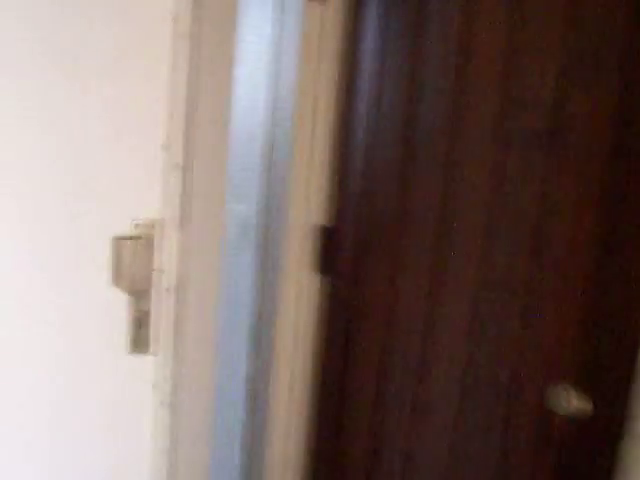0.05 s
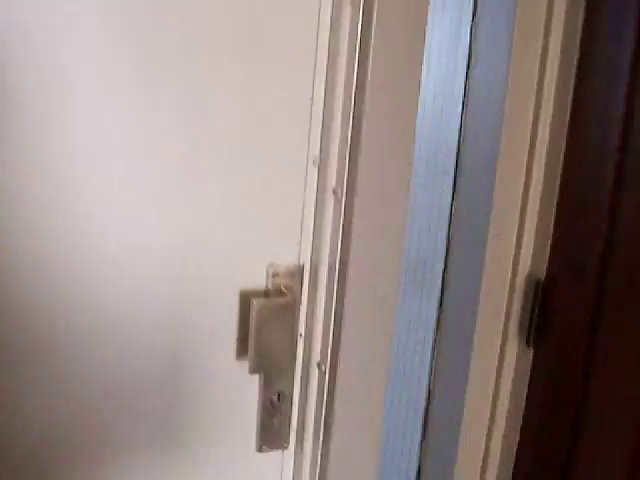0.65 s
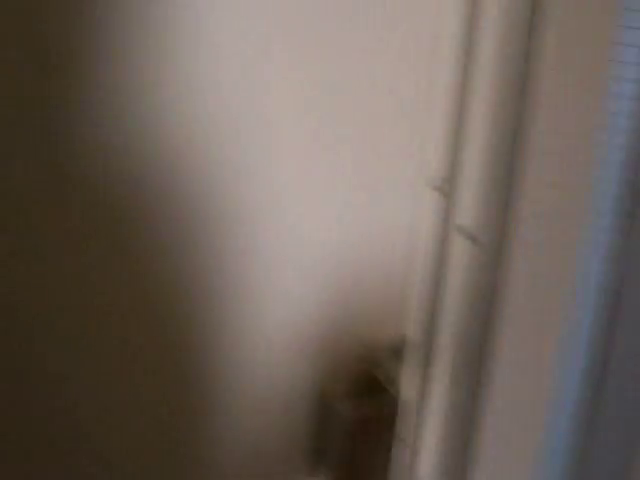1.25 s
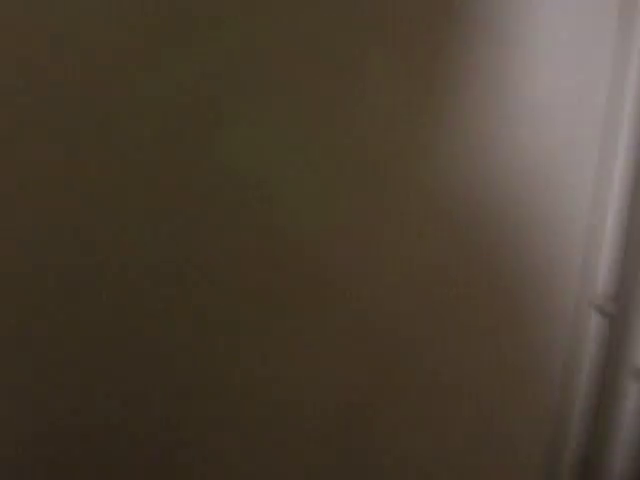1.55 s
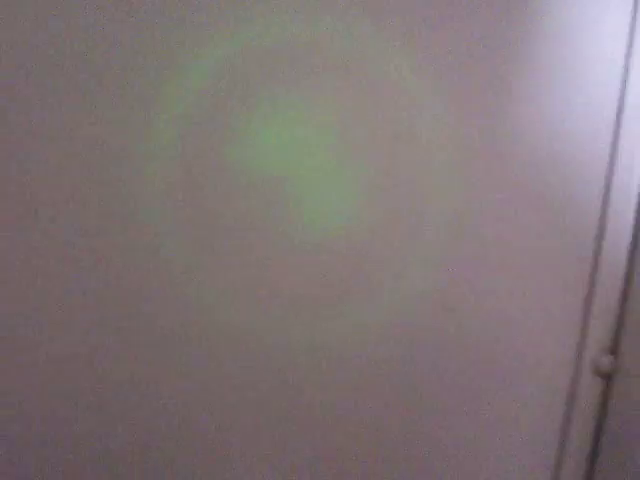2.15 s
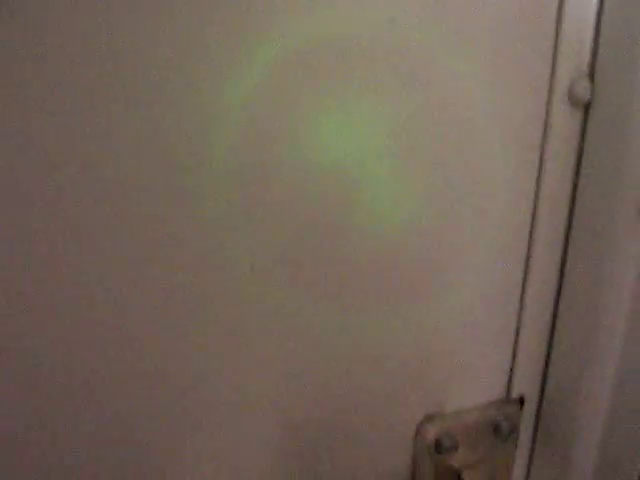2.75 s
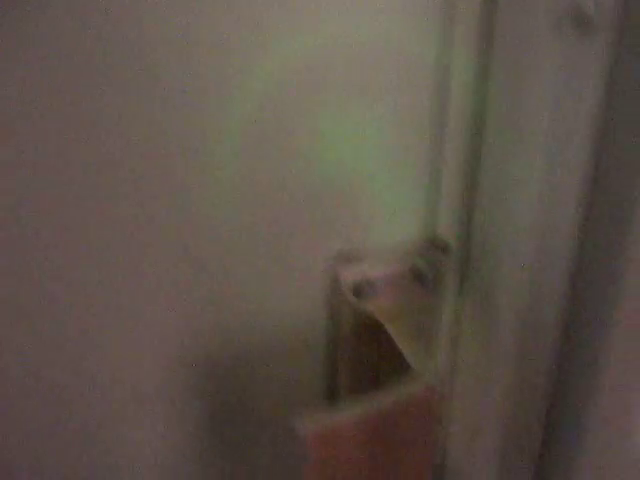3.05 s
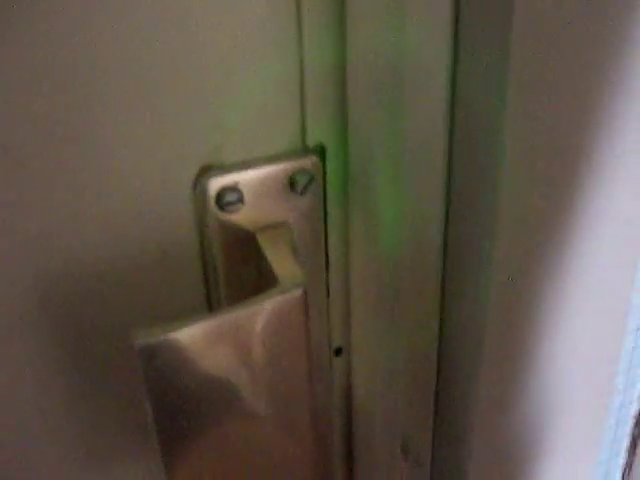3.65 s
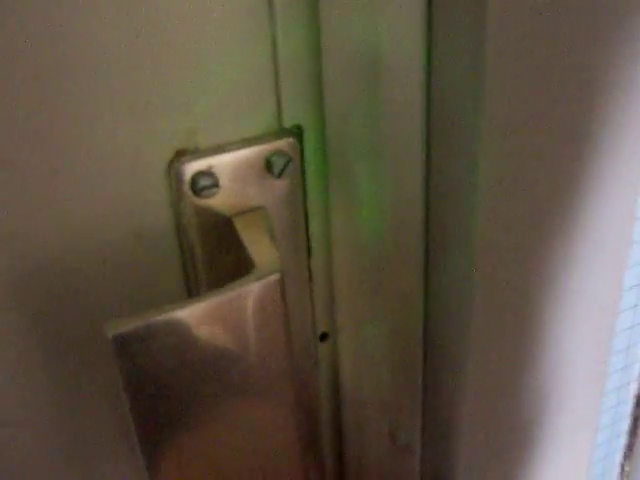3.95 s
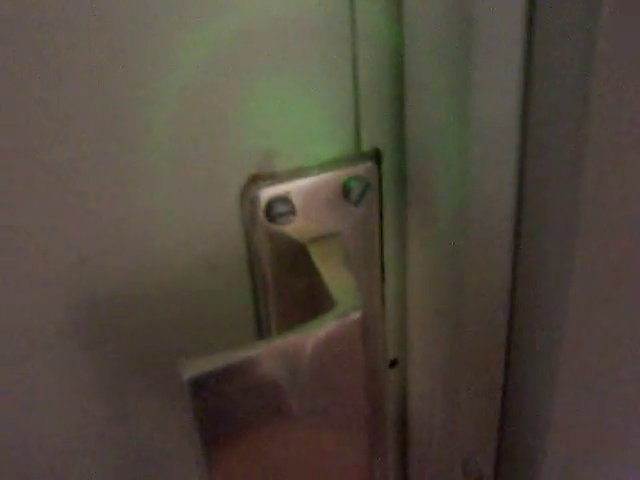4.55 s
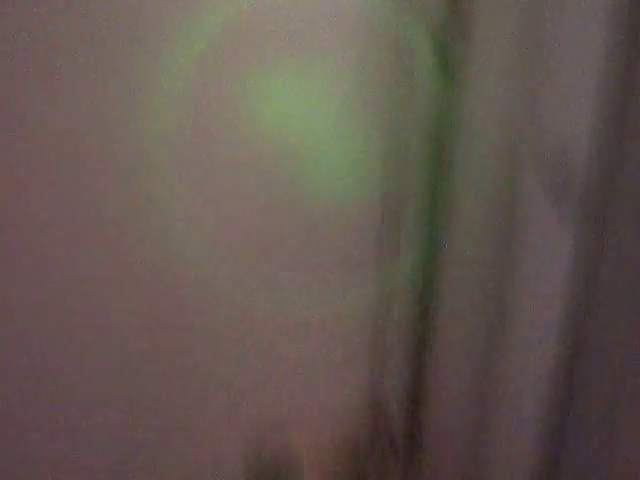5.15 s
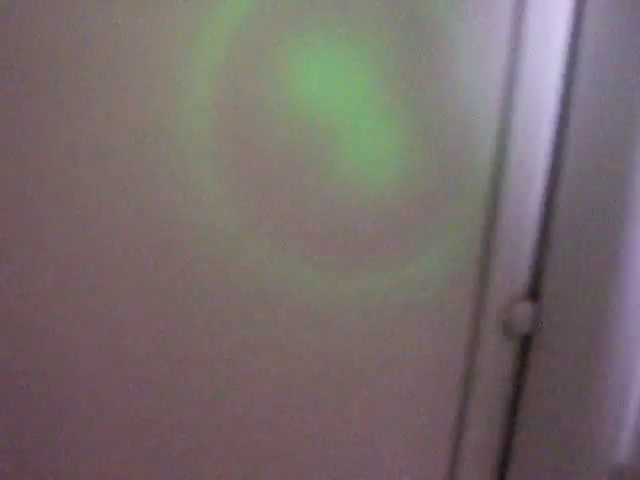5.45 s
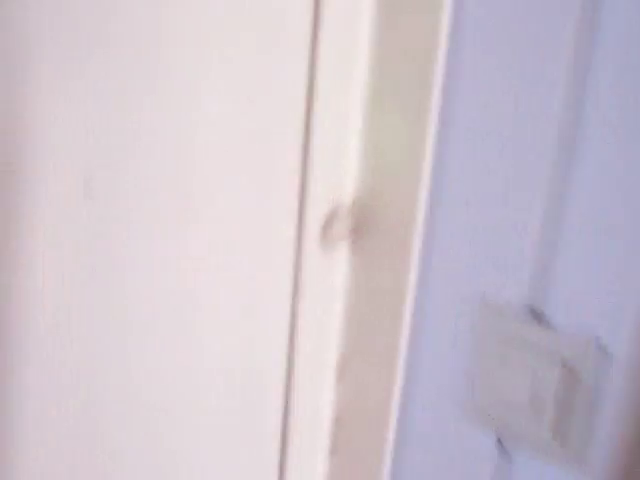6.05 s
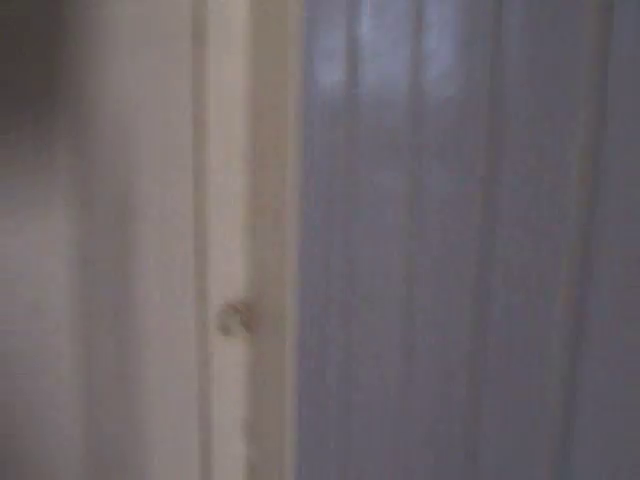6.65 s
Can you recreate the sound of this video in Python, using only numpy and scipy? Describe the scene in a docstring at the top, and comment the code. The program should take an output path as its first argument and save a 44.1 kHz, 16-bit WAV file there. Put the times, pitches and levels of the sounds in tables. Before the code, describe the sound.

In a small hallway, keys jangle and ring close to a hand-held microphone while clothing swishes. One key is pushed into a metal lock and worked around, clicking and scraping as the others dangle and the door bumps softly. Then the door comes open with several loud, deep thuds and a sharp latch clack, followed by a few smaller clicks. Low handling rumble runs underneath.

```python
"""Keys unlocking a door

Someone walks up with a jingling bunch of keys, pushes one into the rim lock and turns it. The keys ring
as they knock together; levers and bolt click and scrape through the lock case; then the door is pulled
free and its leaf booms with heavy thuds. Sleeves rustle, the hand-held microphone rumbles, and the
near walls of a small hallway add short reflections."""
import sys
import numpy as np
from scipy import signal
from scipy.fft import rfft, irfft
from scipy.io import wavfile
from scipy.ndimage import uniform_filter1d, minimum_filter1d

SR = 44100
rng = np.random.default_rng(int(sys.argv[2]) if len(sys.argv) > 2 else 0)


def master(y):
    """Save y as 16-bit WAV."""
    cut = np.clip(np.atleast_2d(y).T, -1, 1)
    pcm = np.round(cut * 32767)  # scale
    wavfile.write(sys.argv[1], SR, pcm.astype(np.int16))


N = 304290
TIME = np.arange(N) / SR
AGE = TIME[:SR // 2]   # time since a blow


def from_db(db):
    return 10 ** (np.asarray(db) / 20)


def rms_one(x):
    return x / np.sqrt(np.mean(x ** 2) + 1e-20)


def peak_one(x, size=88):
    """Scale a blow so that its loudest stretch of size samples has rms 1."""
    return x / np.sqrt(uniform_filter1d(x ** 2, size).max() + 1e-20)


def fader(curve):
    """Gain that rides a curve of t/s, level/dB."""
    return from_db(np.interp(TIME, *np.transpose(curve)))


def add(out, s, x):
    """Mix x into out from time s on."""
    at = max(round(s * SR), 0)
    out[at:at + len(x)] += x[:max(N - at, 0)]


def fade(t60):
    return np.exp(-np.log(1000) * AGE / max(t60, 1e-3))


def filtered(x, hz, kind, order=2):
    sos = signal.butter(order, np.clip(hz, 10, .45 * SR), kind, fs=SR, output="sos")
    return signal.sosfilt(sos, x + 1e-18)


def resonance(x, hz, width_hz):
    """Two-pole resonator with gain 1 at its peak."""
    r, w = np.exp(-np.pi * width_hz / SR), 2 * np.pi * hz / SR
    return signal.lfilter(np.array([1, 0, -1]) * (1 - r * r) / 2, [1, -2 * r * np.cos(w), r * r], x + 1e-18)


def ring(x, hz, t60):
    """A unit click sets a sine of height 1 ringing."""
    r, w = np.exp(-np.log(1000) / (t60 * SR)), 2 * np.pi * hz / SR
    return signal.lfilter([0, np.sin(w)], [1, -2 * r * np.cos(w), r * r], x + 1e-18)


def noise(spectrum):
    """Noise with the given colour, rms 1."""
    hz, db = np.transpose(spectrum)
    log_hz = np.log(np.fft.rfftfreq(N, 1 / SR) + 1)
    colour = from_db(np.interp(log_hz, np.log(hz), db, -90, -90))
    return rms_one(irfft(rfft(rng.standard_normal(N)) * colour, N))


def grains(per_s, spread_db, size=N):
    """Tiny contacts at random moments, of uneven size and sign; rms 1."""
    chance, strength = rng.random((2, size))
    at, out = np.flatnonzero(chance < per_s / SR), np.zeros(size)
    exponential = np.minimum(-np.log(1 - strength[at]), 3)
    out[at] = from_db(spread_db * exponential) * (-1) ** at
    return rms_one(out)


def contact(length_s, per_s, first, build_s):
    """A first touch, then a chatter of smaller ones that builds up and decays by 30 dB in length_s."""
    chatter = grains(per_s, 3.5, size=len(AGE)) * fade(2 * length_s) * (1 - np.exp(-AGE / build_s))
    chatter /= np.sqrt(np.sum(chatter ** 2) + 1e-12)
    chatter[0] += first
    return chatter


# colours of the bed's rumble, air and hiss: f/Hz, level/dB
RUMBLE_COLOUR = [(15, -3.5), (28, -2.5), (45, -6.5), (70, -9.5), (110, -21.5), (200, -26)]
AIR_COLOUR = [(60, -5.5), (110, 4), (190, -1.5), (300, -3), (500, -10.5), (900, -16.5), (1600, -24),
              (3500, -47.5)]
HISS_COLOUR = [(700, -10.5), (1300, 0.5), (2000, 4), (3200, 3), (4700, 1), (7000, 1.5), (8200, -3),
               (9500, -27)]
# body moves that jolt the microphone: t/s, rumble/dB, clothes rustle/dB, hold/s, t60/s
BODY_MOVES = [(0.483, -31, -45.5, 0.062, 0.78), (1.244, -29, -49, 0.53, 1.6), (1.66, -30, -45, 0.35, 1.1),
              (3.842, -32.5, -51, .2, 1.04), (4.524, -26, -46, 0.11, 1.9), (4.83, -32, -46.5, 0.057, 2.5),
              (5.307, -40, -45, 0.11, 0.33), (5.619, -14, -38.5, 0.087, 0.5),
              (5.763, -17, -37.5, 0.11, 0.89), (5.926, -11, -32, 0.051, 0.45),
              (6.06, -26, -50.5, 0.056, 1.7), (6.514, -20.5, -51.5, 0.1, 1.7)]


def room_tone_and_handling(rumble_db=-3, hiss_db=-1, grit=0.086, swell_s=0.031):
    """A bed of hallway noise; each body move swells, holds and dies, adding rumble and rustle."""
    jolt, rustle = 0, 0
    for s, jolt_db, cloth_db, hold, t60 in BODY_MOVES:
        age = np.maximum(TIME - s, 0)
        attack = 1 - np.exp(-(age / swell_s) ** 2)
        move = attack * np.exp(-np.log(1000) * np.maximum(age - hold, 0) / t60)
        jolt = np.hypot(jolt, from_db(jolt_db) * move)
        rustle = np.hypot(rustle, from_db(cloth_db) * move)
    still_rumble, still_air, still_hiss = from_db([-41.5, -53, -61.5])   # when nothing moves
    crackle = rms_one(filtered(grains(1100, 5.1), [1300, 6500], "band", order=1))
    rumble = np.hypot(still_rumble, jolt) * noise(RUMBLE_COLOUR)
    air = np.hypot(still_air, rustle) * noise(AIR_COLOUR)
    hiss = np.hypot(still_hiss, from_db(-11.5) * rustle) * (noise(HISS_COLOUR) + grit * crackle)
    return from_db(rumble_db) * rumble + air + from_db(hiss_db) * hiss


def putter(level_db=-40, per_s=30, soft_hz=190):
    """A faint electrical putter: evenly spaced pulses with the edges rounded off."""
    pulses = np.diff(np.floor((TIME - .007) * per_s), prepend=-1)
    soft = filtered(filtered(pulses, soft_hz, "low", order=4), 37, "high", order=1)
    return from_db(level_db) * soft / soft.max()


# resonances of the lock case and its plate, used to colour every metal click: f/Hz, width/Hz, level/dB
CASE_MODES = [(574, 140, 5), (813, 90, 3), (991, 200, -2.5), (1290, 39, 0), (1513, 78, -4), (1763, 61, 0.5),
              (1926, 55, -7), (2184, 41, -5), (2350, 95, -7), (2716, 150, -12), (2672, 120, -13),
              (3200, 120, 1.5), (3624, 84, -8.5), (4280, 130, -4.5), (5270, 170, -5), (5915, 170, 0),
              (6575, 320, 2.5), (7700, 300, 3.5)]


def metal_body(push, direct_db=-12):
    """The metal rings briefly; a little of the contact is heard directly."""
    body = sum((-1) ** k * from_db(db) * resonance(push, hz, width)
               for k, (hz, width, db) in enumerate(CASE_MODES))
    return from_db(direct_db) * push + body


def metal_click(centre_hz, length_s, spread=1.32):
    """One snap or scrape: light parts sound higher than heavy ones, long scrapes start more gently."""
    push = contact(length_s, 4000, first=0.35, build_s=max(.09 * length_s, 1e-4))
    return peak_one(filtered(metal_body(push), [centre_hz / spread, centre_hz * spread], "band", order=1))


# dry metal clicks, first from the carried keys, later from levers, bolt and latch:
# t/s, level/dB, centre f/Hz, length/s
METAL_CLICKS = [(0.082, -34.5, 2620, 0.014), (1.34, -43.5, 5470, 0.022), (1.997, -31.5, 6500, 0.0056),
                (2.434, -29, 4640, 0.0014), (2.575, -22, 3680, 0.00295), (3.6337, -22.5, 4540, 0.0024),
                (3.636, -41.5, 1350, 0.047), (3.714, -48.5, 1750, 0.018), (3.775, -56, 4250, 0.036),
                (3.808, -45, 2460, .008), (3.884, -37.5, 5000, 0.019), (3.912, -35.5, 3300, .012),
                (3.93, -38, 2040, 0.036), (4.062, -46.5, 5000, 0.034), (4.149, -47.5, 3960, .05),
                (4.368, -37.5, 5360, 0.014), (4.529, -44.5, 5000, .02), (4.578, -25.5, 3200, 0.0071),
                (4.927, -45, 2420, 0.023), (5.037, -25.5, 2200, 0.0072), (5.062, -25, 2600, 0.0062),
                (5.16, -45, 4000, 0.0092), (5.232, -35, 6500, 0.0025), (5.305, -40.5, 2130, 0.02),
                (5.354, -41.5, 1600, 0.017), (5.376, -33, 2540, 0.028), (5.903, -25, 3640, 0.059),
                (5.918, -18, 6300, 0.014), (5.927, -22.5, 2150, 0.0049), (5.952, -21.5, 900, 0.0056),
                (6.309, -34, 2300, 0.0077), (6.474, -32, 3260, 0.024), (6.507, -33.5, 3200, 0.11)]
# how hard the key scrapes as it is worked in the lock: t/s, level/dB
KEYWAY_SCRAPE = [(3.62, -80), (3.68, -58), (3.8, -55), (3.93, -49.5), (4.02, -63), (4.15, -67),
                 (4.4, -60.5), (4.62, -47), (4.77, -64.5), (4.93, -62.5), (5.11, -43), (5.25, -67.5),
                 (5.4, -50.5), (5.52, -70.5)]


def clicks_and_scrapes(scrapes_per_s=230, scrape_hz=(1410, 3420), settle_db=-26, top_hz=7200):
    """Dry metal clicks, first from the carried keys, later from the lock, where the turning key scrapes."""
    scraping = filtered(metal_body(grains(scrapes_per_s, 7.4)), scrape_hz, "band", order=1)
    turning = (TIME > KEYWAY_SCRAPE[0][0]) & (TIME < KEYWAY_SCRAPE[-1][0])
    out = fader(KEYWAY_SCRAPE) * rms_one(scraping) * turning
    for s, db, centre_hz, length_s in METAL_CLICKS:
        snap = metal_click(centre_hz, length_s)
        settle = from_db(settle_db) * metal_click(centre_hz=1930, length_s=0.028)   # loose parts
        add(out, s, from_db(db) * (snap + settle))
    return filtered(out, top_hz, "low", order=6)


def key_tick(x):
    """The bright dry tick of brass edges meeting."""
    return filtered(filtered(x, 4000, "high", order=1), 6700, "low") + 0.2 * resonance(x, 4900, 1100)


# how hard the bunch is shaken: t/s, level/dB
BUNCH_SHAKE = [(0.36, -76), (0.5, -46), (0.67, -55), (0.9, -56), (1.14, -71), (1.56, -67), (1.72, -57.5),
               (2.25, -66), (2.5, -43), (2.66, -54), (2.86, -50), (3.16, -50.5), (3.28, -76.5),
               (3.95, -83.5), (4.08, -63), (4.55, -57), (5.06, -61.5), (5.45, -76)]
# modes of the small keys: f/Hz, level/dB, t60/s
SMALL_KEY_MODES = [(3310, -6.5, 0.1), (3320, -5, 0.084), (5120, -20.5, .08), (5630, -21.5, 0.087),
                   (6190, -4.5, 0.12), (6370, -4, .15), (6500, 10.5, 0.12), (6950, 5, 0.12),
                   (6640, 4, 0.084), (7020, -3.5, 0.16), (6916, 4, .08), (7340, 1.5, 0.35),
                   (7360, 7.5, 0.07), (7300, 0, 0.089), (7830, -0.5, .08), (7770, -1, 0.074),
                   (8300, -12.5, 0.049), (8600, -5.5, .05), (8270, -1, 0.12)]


def jingle(level_db=-3, tick_db=-5, per_s=350):
    """The hanging keys keep brushing each other lightly, waking only their high modes."""
    shake = fader(BUNCH_SHAKE) * np.interp(TIME, [.35, .45, 5.2, 5.5], [0, 1, 1, 0])
    shimmer = sum(from_db(db) * rms_one(ring(grains(per_s / 5, 4.5), hz, t60))
                  for hz, db, t60 in SMALL_KEY_MODES[2:])
    ticks = from_db(tick_db) * rms_one(key_tick(grains(per_s, 2.7)))
    return from_db(level_db) * shake * (rms_one(shimmer) + ticks)


def key_ring(push, modes, centre_hz, focus_hz, others_db, detune):
    """Modes near the centre pitch ring most; no two keys are tuned quite alike."""
    out = 0
    for hz, db, t60 in modes:
        share = from_db(others_db) + np.exp(-((hz - centre_hz) / focus_hz) ** 2)
        out = out + share * from_db(db) * ring(push, hz * (1 + rng.normal(0, detune)), t60)
    return peak_one(out)


def stray_hits(count=55, lift_db=5, spread_db=2.5, tick_db=-4, hz=7000, scatter_hz=700, length_s=0.054):
    """Small chance knocks whose level follows the shaking, as rows like KEY_HITS."""
    s, db = np.transpose(BUNCH_SHAKE)
    when, strength, pitch = rng.random((count, 3)).T
    times = s[0] + (s[-1] - s[0]) * (np.arange(count) + when) / count
    levels = np.interp(times, s, db) + spread_db * (2 * strength - 1) + lift_db
    centres = hz + scatter_hz * (2 * pitch - 1)
    return list(zip(times, levels, centres, levels + tick_db, [length_s] * count))


# featured knocks of the small keys: t/s, ring level/dB, centre f/Hz, tick level/dB, rattle length/s
KEY_HITS = [(0.4215, -49, 7500, -52, .1), (0.504, -39, 6600, -68, 0.29), (0.625, -39.5, 7860, -59, .05),
            (0.683, -35, 6860, -43.5, 0.026), (0.7955, -45, 7400, -50, 0.023),
            (0.821, -43.5, 8000, -69, 0.03), (0.863, -41.5, 6000, -49.5, 0.032),
            (0.911, -40, 7770, -73, 0.12), (1.022, -40.5, 7840, -48.5, 0.13),
            (1.592, -42.5, 7870, -68, 0.3), (1.69, -35, 7760, -53, 0.019), (2.297, -35.5, 6940, -45, 0.041),
            (2.3455, -44.5, 7900, -44, 0.13), (2.417, -41, 6360, -44, 0.093),
            (2.441, -42.5, 7150, -44, 0.061), (2.505, -36, 6740, -48.5, 0.059),
            (2.638, -33, 7000, -50, .024), (2.672, -34.5, 6260, -33.5, 0.023),
            (2.701, -28, 6600, -67, 0.18), (2.786, -28, 6340, -70, 0.19), (2.994, -32.5, 7100, -53, 0.033),
            (3.118, -36.5, 6940, -43.5, .037), (3.183, -44, 7250, -49.5, 0.015),
            (4.262, -45.5, 6460, -55, 0.014), (4.564, -33.5, 7000, -52, 0.1),
            (4.621, -33, 6980, -54, 0.046), (4.806, -34.5, 6560, -63, 0.026),
            (4.816, -29, 6600, -64, 0.025), (4.853, -37, 6700, -44.5, 0.1),
            (4.966, -39.5, 6550, -64, 0.024), (5.021, -33.5, 6700, -55.5, .03),
            (5.0377, -27.5, 7100, -26.5, 0.028), (5.103, -34, 6760, -43, 0.032),
            (5.211, -45.5, 7600, -46.5, .024), (6.739, -44, 7400, -61, 0.058),
            (6.8099, -41, 7410, -63, 0.026)]


def clinks(ring_trim_db=-2):
    """Key knocks on key: a dry rattle and the ringing that it leaves."""
    out = np.zeros(N)
    for s, ring_db, centre_hz, tick_db, length_s in KEY_HITS + stray_hits():
        push = contact(length_s, 1000, first=0.36, build_s=.002)
        rings = key_ring(push, SMALL_KEY_MODES, centre_hz, focus_hz=520, others_db=-15, detune=0.0029)
        tick = peak_one(key_tick(push))
        add(out, s, from_db(ring_db + ring_trim_db) * rings + from_db(tick_db) * tick)
    return out


# touches on the long key: t/s, level/dB, centre f/Hz, rattle length/s
LONG_KEY_HITS = [(0.462, -47.5, 3750, .02), (0.485, -43.5, 1500, 0.036), (0.907, -50, 2500, 0.0092),
                 (2.5, -49, 3200, 0.062), (2.702, -40.5, 2100, 0.045), (2.782, -39.5, 2230, 0.18),
                 (2.817, -41, 3200, .04), (4.613, -46, 3160, .06), (4.808, -48, 3200, .08)]
# its modes: f/Hz, level/dB, t60/s
LONG_KEY_CHIME = [(2120, 4.5, 0.12), (2130, -6, 0.13), (2425, -5, .2), (3300, 6, 0.14), (3200, 2, 0.22),
                  (3760, 2.5, .08), (4200, -10.5, .1)]


def long_key():
    """Touched now and then, the long key chimes lower than the others."""
    out = np.zeros(N)
    for s, db, centre_hz, length_s in LONG_KEY_HITS:
        push = contact(length_s, 920, first=0.5, build_s=.002)
        chime = key_ring(push, LONG_KEY_CHIME, centre_hz, focus_hz=395, others_db=-6.5, detune=0.0023)
        add(out, s, from_db(db) * chime)
    return filtered(out, 2400, "high")


# sleeves and hands brushing past: t/s, level/dB, centre f/Hz, t60/s
SLEEVE_STROKES = [(0.479, -48.5, 3100, .8), (0.52, -45, 270, 0.85), (1.26, -49, 327, 0.89),
                  (1.511, -46.5, 554, 0.67), (1.72, -47, 330, 1.24), (1.801, -44, 3000, .6),
                  (4.33, -54, 604, 0.39), (5.63, -46.5, 990, 0.14), (5.773, -47.5, 2300, 0.18),
                  (6.49, -43, 1090, 0.31)]


def sleeves(grit=0.97, spread=2.03, swell_s=0.021):
    """Each stroke swells and fades: countless fibres slipping, a few of them catching."""
    out = np.zeros(N)
    for s, db, hz, t60 in SLEEVE_STROKES:
        fibres = rng.standard_normal(len(AGE)) + grit * grains(1500, 1.4, size=len(AGE))
        swish = rms_one(filtered(fibres, [hz / spread, hz * spread], "band"))
        stroke = (1 - np.exp(-(AGE / swell_s) ** 2)) * fade(t60)
        add(out, s, from_db(db) * stroke / stroke.max() * swish)
    return out


# modes of one key ringing freely: f/Hz, level/dB, t60/s
PING_PARTIALS = [(3250, -27, .03), (6648, -20, .05), (6903, -9, .16), (7325, -4, .135), (7340, -4, .035),
                 (8676, -17, .13)]


def key_ping(at_s=2.5758, level_db=2.5, attack_s=0.00067):
    """One key is struck hard and its partials beat as it dies; only its treble is heard."""
    out = np.zeros(N)
    partials = sum(from_db(db) * fade(t60) * np.sin(2 * np.pi * hz * AGE) for hz, db, t60 in PING_PARTIALS)
    add(out, at_s, from_db(level_db) * partials * (1 - np.exp(-AGE / attack_s)))
    return filtered(out, 2500, "high", order=3)


# blows on the door leaf: t/s, level/dB, hardness as low-pass f/Hz, hand damping t60/s
DOOR_HITS = [(3.657, -31.5, 292, 1.6), (3.74, -34.5, 300, 1), (3.931, -29, 337, 0.99),
             (3.99, -29.5, 231, 1.8), (4.573, -23, 208, 3), (4.729, -24.5, 236, 7.3),
             (5.035, -30, 425, 0.92), (5.641, -8.5, 180, 1.7), (5.815, -16.5, 460, 0.44),
             (5.939, -4, 280, 0.23), (5.955, -12, 620, 0.032), (5.986, -12, 375, 0.033),
             (6.119, -21, 162, 0.19), (6.555, -18, 160, 4.1)]
# modes of the leaf: f/Hz, level/dB, t60/s
LEAF_MODES = [(40.1, -2.5, 0.54), (54.6, -0.5, 0.25), (74.1, -1.5, 0.77), (131.1, -1.5, 0.69),
              (159.7, -4, 0.37), (200.9, -5.5, 0.55), (246, -9.5, 0.28), (280, -9.5, 0.64),
              (324, -5.5, 0.1), (361, -5.5, 0.072), (440, -6.5, 0.091), (504, -19.5, 0.11), (544, -7, 0.19),
              (651, -7.5, 0.15)]


def door(trim_db=-2, judder_db=-2, judder_t60_s=0.29, judder_hz=400):
    """The leaf booms in its modes and judders in the frame; a soft push leaves only the lowest."""
    out = np.zeros(N)
    leaf = sum((-1) ** k * from_db(db) * fade(t60) * np.sin(2 * np.pi * hz * AGE)
               for k, (hz, db, t60) in enumerate(LEAF_MODES))
    for s, db, hard_hz, held_t60 in DOOR_HITS:
        rattle = rms_one(filtered(rng.standard_normal(len(AGE)), judder_hz, "low", order=1))
        judder = from_db(judder_db) * rattle * fade(judder_t60_s)
        thud = filtered((leaf + judder) * fade(held_t60), hard_hz, "low", order=3)
        add(out, s, from_db(db + trim_db) * peak_one(thud, size=200))
    return out


def far_knock(at_s=6.744, level_db=-34.5, tail_db=-9, tail_t60_s=0.63, band_hz=(270, 600)):
    """A short, hollow wooden knock further off that is mostly room."""
    out = np.zeros(N)
    burst = rng.standard_normal(len(AGE)) * (fade(0.093) + from_db(tail_db) * fade(tail_t60_s))
    add(out, at_s, from_db(level_db) * peak_one(filtered(burst, band_hz, "band", order=3), size=600))
    return out


def hallway(x, wet_db=-14.5, t60_s=0.13, dull_hz=4500):
    """Dense reflections from near walls, a little duller and thinner than the direct sound."""
    echoes = filtered(rng.standard_normal(len(AGE)), dull_hz, "low", order=1) * fade(t60_s) * (AGE > .003)
    echoes /= np.sqrt(np.sum(echoes ** 2))
    return from_db(wet_db) * signal.fftconvolve(filtered(x, 320, "high"), echoes)[:N]


def scene(ping_send_db=-15.5):
    """Mono mix: keys, lock and door feed the hallway reverb; the handling stays close and dry."""
    near = clinks() + jingle() + long_key() + clicks_and_scrapes() + door()
    ping = key_ping()
    room = hallway(near + from_db(ping_send_db) * ping)
    return (near + ping + room + far_knock() + sleeves() + room_tone_and_handling() + putter())[None]


def gain_control(x, limit_db=-11.5, recovery_db_per_s=5.5):
    """A loud sound turns the gain down at once; it creeps back up."""
    power = np.maximum(uniform_filter1d(x ** 2, size=176), 1e-12)
    over_db = np.maximum(10 * np.log10(power) - limit_db, 0)
    recovery_db = recovery_db_per_s * TIME
    cut_db = np.maximum.accumulate(over_db + recovery_db, axis=-1) - recovery_db
    return x * from_db(uniform_filter1d(minimum_filter1d(-cut_db, size=220), size=88))


def record(dry, cutoff_hz=8900):
    """A small microphone with gain control: subsonic drift is removed and the top is cut steeply."""
    heard = gain_control(filtered(filtered(dry, 6.4, "high"), 7835, "low", order=6))
    return signal.sosfilt(signal.ellip(10, .5, 80, cutoff_hz, fs=SR, output="sos"), heard)


dry = scene()
out = record(dry)
master(out)
```